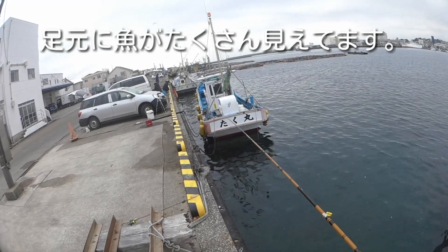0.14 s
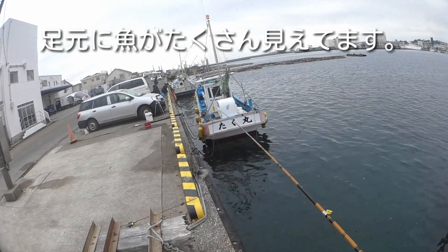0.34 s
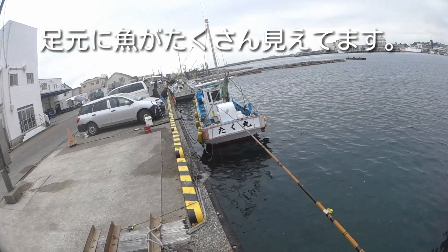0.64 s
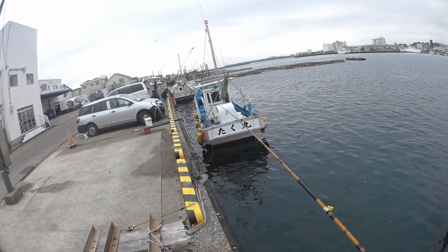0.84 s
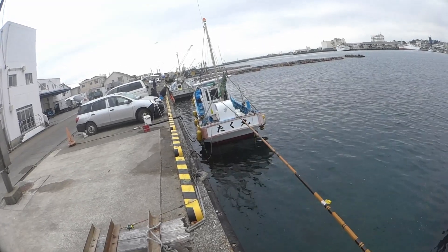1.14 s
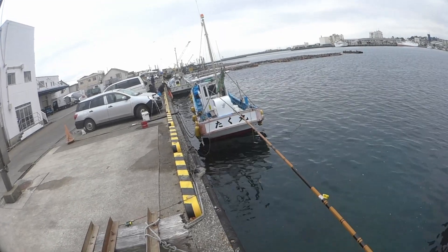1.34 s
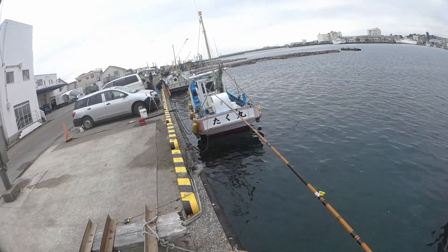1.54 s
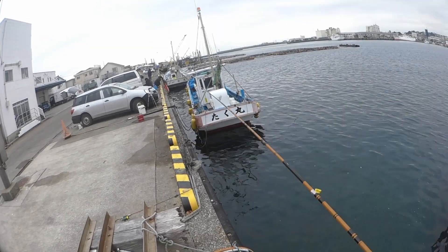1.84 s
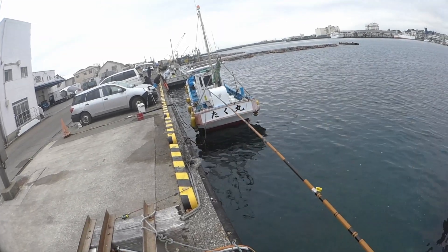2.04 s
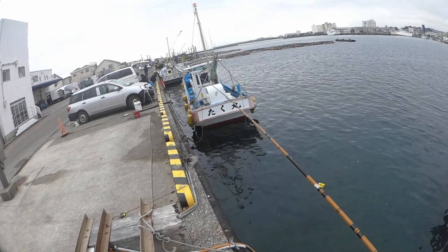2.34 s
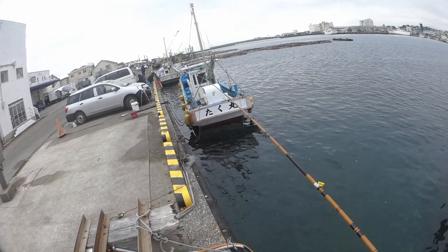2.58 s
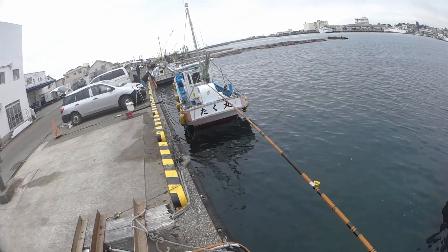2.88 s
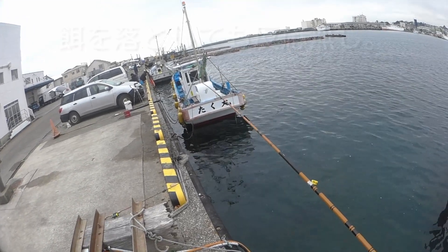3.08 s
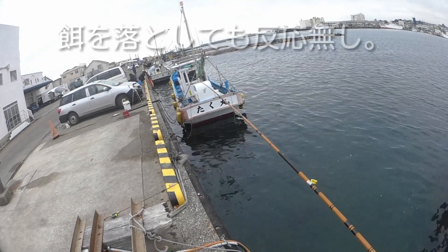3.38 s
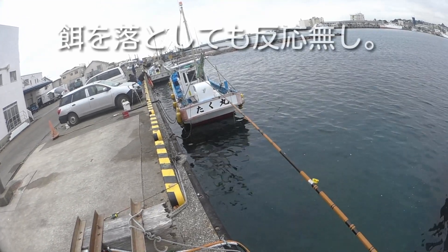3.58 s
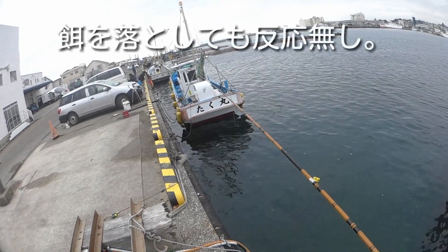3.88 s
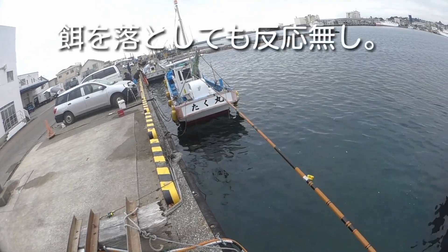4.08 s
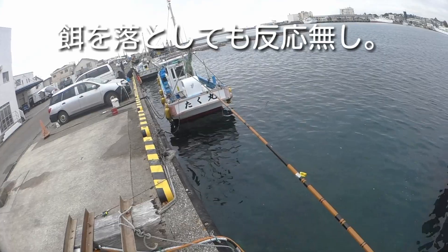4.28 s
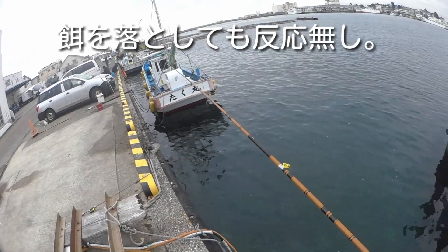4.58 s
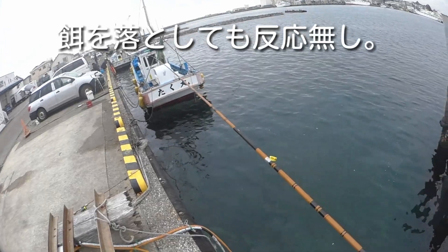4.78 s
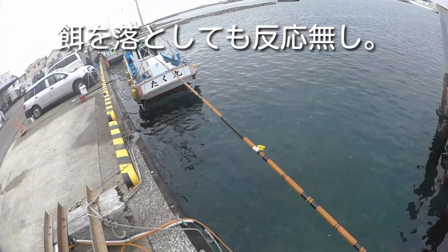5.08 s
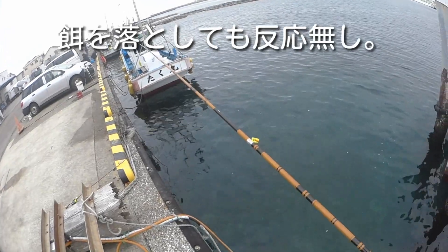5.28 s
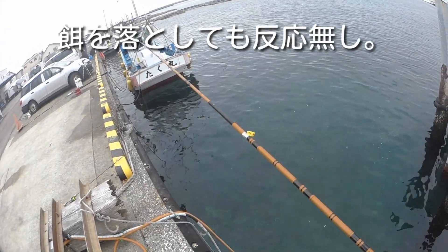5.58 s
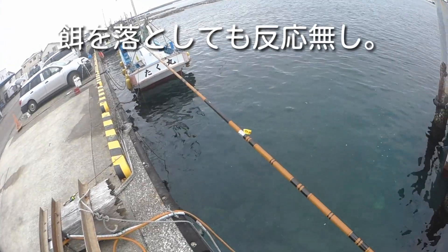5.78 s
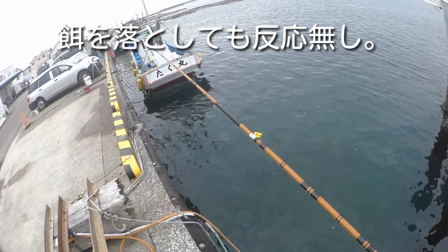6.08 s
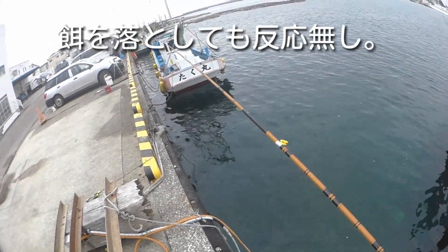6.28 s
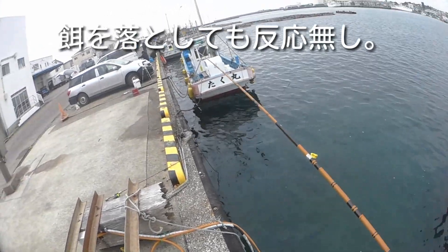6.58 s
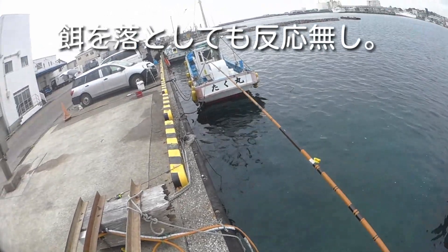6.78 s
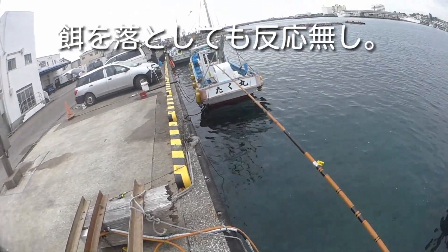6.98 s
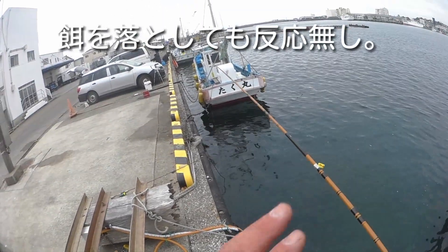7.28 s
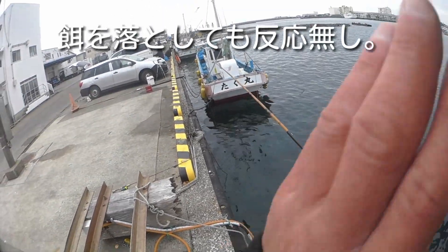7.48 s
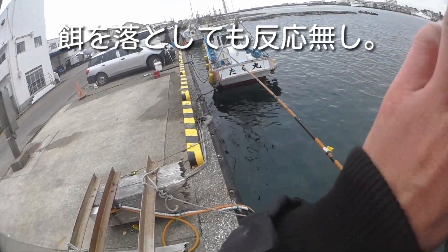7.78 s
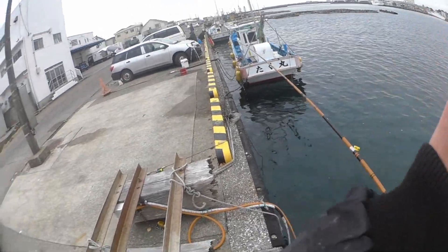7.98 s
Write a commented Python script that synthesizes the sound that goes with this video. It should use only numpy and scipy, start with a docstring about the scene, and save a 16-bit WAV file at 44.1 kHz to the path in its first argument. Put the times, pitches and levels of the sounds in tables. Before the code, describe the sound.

Small waves lap at a harbour wall throughout, heard in mono through a sealed camera case: a steady, dull, patchy wash, mostly midrange, bubbling with countless small drops. Over it a very thin flickering hiss and a faint high buzz of camera circuits persist. From 0.2 to 0.55 seconds, low hollow mount knocks mix with plips, the loudest at 0.44. Scattered plips continue, with softer knocks near 1.1, 1.5 and 1.9. Stronger knocks fall at 2.7 and 3.0, the latter with a brief faint squeak. Plips thicken from 3.3, with sharp ones at 4.12 and 4.43. Soft gulps sound at 5.03 and 7.28, with brighter plips around 5.7 and 6.8. Weak knocks come at 7.1 and 7.5. From 7.9 to 8.1, dry ticks and short sleeve rustles brush the housing quietly.

```python
"""Small waves lap at a concrete harbour wall, heard by a camera shut in a watertight housing.
The water is a dull patchy wash of coloured noise, full of short plips and a few gulps that ring and die.
The mount gives low knocks and judders, damped rings with a noisy tail, as the wearer moves.
Above a dead zone near 5 kHz lie a thin hiss, the gated tones of the camera's circuits, a faint squeak
and the dry rustles of a sleeve, which are clicks and gritty noise ringing in treble bands."""
import sys
import numpy as np
from scipy import signal
from scipy.fft import rfft, irfft, next_fast_len
from scipy.io import wavfile

SR = 44100
rng = np.random.default_rng(int(sys.argv[2]) if len(sys.argv) > 2 else 0)


def pcm_store(signal):
    """Save signal as 16-bit PCM."""
    levels = np.round(np.clip(np.atleast_2d(signal), -1, 1) * 32767)
    wavfile.write(sys.argv[1], SR, levels.astype(np.int16).T)


N = 358974

# Lapping of the water, joined by straight lines: t/s, wash level/dB, low slosh level/dB
LAPPING = [(0.0, -35, -50.5), (0.79, -35, -56), (1.84, -35, -54), (2.27, -34.5, -59), (2.95, -35.5, -53.5),
           (3.47, -34.5, -57.5), (3.97, -34, -59.5), (4.81, -33.5, -55.5), (5.19, -36.5, -57.5),
           (5.6, -32.5, -55), (6.44, -34, -59.5), (6.8, -33, -56), (7.6, -33, -54), (7.8, -35.5, -57),
           (8.14, -35, -53)]
# Relative spectrum of the water: f/Hz, level/dB per Hz
WASH_SPECTRUM = [(30, -29), (86, -29.5), (142, -15.5), (194, -18), (307, -13.5), (395, -10.5), (553, -7.5),
                 (1230, -2.5), (1680, -4), (1910, -4), (3360, -21), (3730, -29.5), (4500, -65.5),
                 (5850, -90.5)]
# Loud plips of water, ahead of the housing: crest t/s, peak level/dB, pitch f/Hz
PLIPS = [(0.2112, -23, 945), (0.2904, -20, 720), (0.305, -21, 690), (0.4097, -21.5, 1160),
         (0.421, -25, 1550), (0.4262, -14, 860), (0.4398, -7, 1120), (0.4432, -22, 850),
         (0.4777, -21, 2150), (0.54, -14, 2280), (0.8757, -20, 2080), (0.9597, -19, 1970),
         (1.019, -18.5, 2480), (1.072, -20.5, 1740), (1.5279, -15, 1340), (1.5587, -15, 1240),
         (1.5635, -17.5, 1400), (1.792, -20.5, 950), (1.8961, -20, 800), (2.3316, -17, 1790),
         (2.3566, -17, 1780), (2.4872, -21, 3380), (2.6052, -18.5, 2050), (2.7588, -32, 1150),
         (2.8006, -18, 1470), (2.887, -21.5, 1060), (2.8968, -23, 1000), (3.017, -22, 1760),
         (3.241, -21, 1830), (3.3475, -20.5, 1880), (3.4343, -18, 1700), (3.5013, -16.5, 1480),
         (3.6142, -25.5, 750), (3.7233, -18, 1990), (3.8112, -15.5, 3540), (3.8636, -21, 1110),
         (3.994, -19, 1910), (4.092, -18.5, 1950), (4.1175, -10, 1700), (4.2348, -20, 1740),
         (4.2502, -16, 1640), (4.357, -18, 2000), (4.3675, -17.5, 1870), (4.4318, -6.5, 1530),
         (4.604, -19.5, 1820), (4.7097, -20.5, 1050), (4.7382, -18.5, 1410), (4.783, -17, 1180),
         (4.8293, -17.5, 2100), (4.9057, -17, 1160), (5.002, -17, 1630), (5.0158, -17, 1630),
         (5.3663, -20, 1900), (5.4427, -15.5, 1330), (5.4941, -22.5, 1060), (5.7197, -12.5, 1620),
         (5.7465, -15, 1520), (5.8093, -19, 1450), (5.958, -19, 1860), (6.0292, -14.5, 1140),
         (6.0422, -18, 1460), (6.093, -17.5, 1940), (6.168, -17, 1600), (6.3, -21, 1550),
         (6.3317, -18, 2020), (6.3499, -19.5, 3220), (6.5597, -19.5, 1230), (6.6278, -17, 1380),
         (6.7843, -12, 1560), (6.812, -20.5, 1600), (7.015, -25, 1200), (7.2007, -23.5, 1670),
         (7.2322, -19, 1470), (7.3129, -18, 1430), (7.3234, -23, 2560), (7.373, -23, 1280),
         (7.4018, -23.5, 2800), (7.5762, -17.5, 1910), (8.0315, -18.5, 2300)]
# Longer pitched gulps, ahead of the housing: crest t/s, peak level/dB, pitch f/Hz, rise/cycles
GULPS = [(2.059, -48, 170, 7.1), (5.031, -35, 540, 3.0), (5.035, -32.5, 413, 4.5), (7.278, -31, 486, 3),
         (7.292, -34, 576, 3.4)]
# Low knocks of the mount, ahead of the housing: crest t/s, peak level/dB, pitch f/Hz
KNOCKS = [(0.299, -26.5, 282), (0.319, -34, 208), (0.3403, -20, 364), (0.4253, -18.5, 346),
          (0.436, -24, 350), (0.4512, -22, 288), (0.478, -28, 480), (0.5146, -28, 378), (1.077, -29, 306),
          (1.1042, -26.5, 556), (1.5295, -26.5, 625), (1.8726, -28.5, 332), (1.8933, -28, 278),
          (1.943, -31, 292), (1.9569, -29, 473), (2.7207, -18, 496), (2.7572, -22, 374),
          (2.773, -23.5, 510), (3.02, -29, 420), (3.036, -21, 388), (3.05, -29, 320), (7.1095, -30.5, 304),
          (7.4918, -24, 590), (7.5327, -29.5, 398)]
# Shifts of the mount, each a run of weak dull knocks: start t/s, length/s, peak level/dB
SHIFTS = [(0.021, 0.07, -33), (0.472, 0.08, -34), (2.987, 0.045, -38), (6.731, 0.15, -43)]
# Dry ticks on the housing: t/s, level/dB near 10 kHz, level/dB near 15 kHz
TICKS = [(3.1794, -53, -60), (5.8066, -51, -55), (6.529, -50, -45), (7.771, -51, -61), (7.9303, -48, -56),
         (7.98, -48, -54), (7.9915, -54, -60), (8.009, -58, -46), (8.026, -55, -44), (8.053, -54, -43),
         (8.0645, -62, -51), (8.1178, -58, -52.5)]
# Strokes of a sleeve over the housing: crest t/s, level/dB near 10 kHz, level/dB near 15 kHz
STROKES = [(7.93, -56, -62), (7.985, -59, -64), (8.055, -70, -59), (8.12, -54, -65)]
# Treble bands in which ticks and strokes ring: f/Hz, width/Hz
RUSTLE_RINGS = [(9800, 1700), (15000, 1300)]
# A faint high squeak: starting rms level/dB, f/Hz, width/Hz, time to fall 60 dB/s
SQUEAK = [(-63, 6800, 660, 0.13)]
# Relative spectrum of the thin hiss: f/Hz, level/dB per Hz
HISS_SPECTRUM = [(4300, -47.5), (4600, -38.5), (5100, -16.5), (5450, -23.5), (5680, -49), (5960, -14.5),
                 (6530, -8.5), (6820, -5), (7620, -6.5), (8500, -2), (9870, -1.5), (11000, -4),
                 (12700, -5.5), (14800, -4), (15600, 6.5)]
LOW_CLOCK_HZ, HIGH_CLOCK_HZ = 6773.2, 14853.1
# Circuit spikes that gate free-running clocks in each frame:
# t in the frame/ms, peak level/dB, clock f/Hz, rise to the crest/ms, phase jitter/rad
SPIKES = [(.6, -65, LOW_CLOCK_HZ, 0.8, .1), (2.0, -60, HIGH_CLOCK_HZ, .3, 1.5),
          (4.75, -56.5, HIGH_CLOCK_HZ, .35, .8), (13.05, -50.5, HIGH_CLOCK_HZ, .35, .8)]

FRAME_HZ = 59.94
HISS_DB = -59.5
SQUEAK_START_S = 3.012
SNAP_HZ, SNAP_WIDTH_HZ, SNAP_DB = 9400, 3400, -8   # broad front of a tick, against its level near 10 kHz
STROKE_RISE_DB_PER_S, STROKE_FALL_DB_PER_S = 800, 300
JUDDER_GAP_S, JUDDER_HZ = 0.027, 237
KNOCK_OVERTONE_RATIO, KNOCK_OVERTONE_DB = 2.15, -5.5
SOFT_RING_DB_PER_DB = 0.14   # softer blows ring longer
HOUSING_LOW_HZ, HOUSING_HIGH_HZ = 112, 3140
HOUSING_LAG_S = 0.00046   # blows start early by this much to allow for the housing's delay
CUTOFF_HZ = 15650


def from_db(db):
    """A level in decibels is twenty times the logarithm of the amplitude ratio; return that ratio."""
    return 10 ** (np.asarray(db) / 20)


def rms_one(x):
    """Dividing by the root mean square gives unit effective amplitude."""
    return x / np.sqrt(np.mean(x ** 2) + 1e-20)


def in_time(rows):
    """Linear interpolation turns each level column into one value per sample."""
    times, *columns = np.transpose(rows)
    return [np.interp(np.arange(N) / SR, times, column) for column in columns]


def drift(corner_hz):
    """Noise through two equal one-pole low-passes wanders slowly; made at every 20th sample, rms 1."""
    step, settling = 20, 3000
    pole = np.exp(-2 * np.pi * corner_hz * step / SR)
    noise = rng.standard_normal(N // step + settling + 2)
    slow = signal.lfilter([1], [1, -2 * pole, pole * pole], noise)[settling:]
    return np.interp(np.arange(N) / step, np.arange(len(slow)), rms_one(slow))


def grit(shape, power):
    """Raising the magnitude of noise to a power above one makes it spiky; rms 1."""
    noise = rng.standard_normal(shape)
    return rms_one(np.sign(noise) * np.abs(noise) ** power)


def colour(x, spectrum):
    """Multiplying a flat spectrum by a gain curve, linear in log frequency, colours it; rms 1."""
    size = next_fast_len(N)
    hz = np.maximum(np.arange(size // 2 + 1) * SR / size, 1)
    curve_hz, curve_db = np.transpose(spectrum)
    gain = from_db(np.interp(np.log(hz), np.log(curve_hz), curve_db))
    return rms_one(irfft(rfft(x, size) * gain, size)[:N])


def patchy_noise(edges_hz, swell, shared_db, own_db, corner_hz):
    """Amplitude modulation of noise bands, partly in common and partly independent, makes patches."""
    spectrum = rfft(rng.standard_normal(N))
    hz = np.arange(N // 2 + 1) * SR / N
    out = np.zeros(N)
    for low, high in zip(edges_hz, edges_hz[1:]):
        band = irfft(spectrum * (hz >= low) * (hz < high), N)
        out += band * from_db(shared_db * swell + own_db * drift(corner_hz))
    return out


def bump(rise_s):
    """A cubed gamma envelope swells smoothly to 1 after rise_s seconds and falls more slowly."""
    n = np.arange(int(5 * rise_s * SR) + 2) / (rise_s * SR)
    return (n * np.exp(1 - n)) ** 3


def wavelet(hz, cycles):
    """A damped oscillation swells for some cycles to height 1; also returns the samples to its crest."""
    rise_s = max(cycles, .1) / hz
    envelope = bump(rise_s)
    since_crest = np.arange(len(envelope)) / SR - rise_s
    return envelope * np.cos(2 * np.pi * hz * since_crest), int(rise_s * SR)


def add(out, at, sound):
    """Superposition: mix a short sound in at a sample."""
    at = max(at, 0)
    out[at:at + len(sound)] += sound[:max(N - at, 0)]


def ring(hz, width_hz, x):
    """A broad resonance passes the band around its centre frequency."""
    band = [hz - width_hz / 2, hz + width_hz / 2]
    sos = signal.butter(2, band, "band", fs=SR, output="sos")
    return signal.sosfilt(sos, x + 1e-18)   # the tiny offset keeps silence from slowing the filter


def struck(table, cycles, tail_db, tail_cycles):
    """Each blow excites a damped ring and a dying noisy patter; high and soft blows ring more cycles."""
    tail_length = 4000
    loudest_db = max(row[1] for row in table)
    out, patter = np.zeros(N), grit((len(table), tail_length), 2.17)
    for (crest_s, db, hz), noise in zip(table, patter):
        softness = from_db(SOFT_RING_DB_PER_DB * (loudest_db - db))
        sound, crest = wavelet(hz, cycles * (hz / 1000) ** 0.43 * softness)
        short, rise = wavelet(hz, 1.077)
        elapsed_cycles = np.arange(tail_length) * hz / SR
        tail = noise * from_db(tail_db - 60 * elapsed_cycles / tail_cycles) / np.sqrt(rise)
        at = round((crest_s - HOUSING_LAG_S) * SR)
        add(out, at - crest, from_db(db) * np.sign(noise[0]) * sound)   # either polarity
        add(out, at, from_db(db) * signal.fftconvolve(tail, short))
    return out


def circuit_buzz():
    """Periodic gating of steady clock tones buzzes at the frame rate; spikes vary in strength and phase."""
    out = np.zeros(N)
    frames_s = np.arange(int(N / SR * FRAME_HZ)) / FRAME_HZ
    for ms, db, hz, rise_ms, jitter in SPIKES:
        clicks, chance = np.zeros(N, complex), rng.standard_normal((len(frames_s), 2))
        at = np.round((frames_s + ms / 1000) * SR).astype(int)
        clicks[at] = from_db(db + 2.7 * chance[:, 0]) * np.exp(1j * jitter * chance[:, 1])
        gate = np.convolve(clicks, bump(rise_ms / 1000))[:N]
        gate = np.roll(gate, -int(rise_ms / 1000 * SR))   # crests fall on the spike times
        out += np.real(gate * np.exp(2j * np.pi * hz * np.arange(N) / SR))
    return out


def hiss(swell):
    """Modulated broadband noise: a thin flickering treble follows the water's swells a little."""
    noise = patchy_noise(np.geomspace(4000, 17000, 7), swell, shared_db=1.5, own_db=0.15, corner_hz=25.0)
    return from_db(HISS_DB) * colour(noise, HISS_SPECTRUM)


def squeak():
    """Exponentially decaying noise in a narrow band is heard as a faint squeak."""
    (db, hz, width_hz, t60_s), = SQUEAK
    since = np.arange(N) / SR - SQUEAK_START_S
    fading = (since > 0) * from_db(db - 60 * np.maximum(since, 0) / t60_s)
    return ring(hz, width_hz, fading * rng.standard_normal(N)) * np.sqrt(SR / 2 / width_hz)


def ticks():
    """An impulse excites every resonance at once: each tick rings in two treble bands and a broad snap."""
    at = [round(row[0] * SR) for row in TICKS]
    clicks = np.zeros(N)
    clicks[at] = [from_db(row[1] + SNAP_DB) * SR / SNAP_WIDTH_HZ / 2 for row in TICKS]
    out = ring(SNAP_HZ, SNAP_WIDTH_HZ, clicks)
    for column, (hz, width_hz) in enumerate(RUSTLE_RINGS, start=1):
        clicks = np.zeros(N)
        clicks[at] = [from_db(row[column]) * SR / width_hz for row in TICKS]
        out += ring(hz, width_hz, clicks)
    return out


def sleeve_strokes():
    """Friction as a train of random impulses: gritty noise swells fast, fades and rings in two bands."""
    now, out = np.arange(N) / SR, np.zeros(N)
    for column, (hz, width_hz) in enumerate(RUSTLE_RINGS, start=1):
        strokes = np.zeros(N)
        for row in STROKES:
            since = now - row[0]
            slope_db = np.minimum(STROKE_RISE_DB_PER_S * since, -STROKE_FALL_DB_PER_S * since)
            strokes += from_db(row[column] + slope_db)
        rub = strokes * from_db(3.4 * drift(250.0)) * grit(N, 1.9)
        out += ring(hz, width_hz, rub * np.sqrt(SR / 2 / width_hz))
    return out


def judders():
    """Repeated weak impacts at uneven gaps and pitches as the mount shifts, as rows of knocks."""
    rows = []
    for start_s, length_s, db in SHIFTS:
        for k, (late, high) in enumerate(rng.standard_normal((9, 2))):
            if k * JUDDER_GAP_S < length_s:
                knock_s = start_s + abs(k + 0.127 * late) * JUDDER_GAP_S
                rows.append((knock_s, db, JUDDER_HZ * np.exp(0.14 * high)))
    return rows


def mount_knocks():
    """A blow excites more than one mode: low rings, with an overtone on the knocks but not the judders."""
    low = struck(KNOCKS + judders(), cycles=1.22, tail_db=-7.5, tail_cycles=32.0)
    upper = [(s, db + KNOCK_OVERTONE_DB, hz * KNOCK_OVERTONE_RATIO) for s, db, hz in KNOCKS]
    return low + struck(upper, cycles=1.2, tail_db=-17.0, tail_cycles=40.0)


def housing(x):
    """The sealed case acts as a band-pass and weakens what is sharp and what is deep."""
    low_pass = signal.butter(12, HOUSING_HIGH_HZ, fs=SR, output="sos")
    high_pass = signal.butter(4, HOUSING_LOW_HZ, "high", fs=SR, output="sos")
    return signal.sosfilt(high_pass, signal.sosfilt(low_pass, x + 1e-18))


def gulps():
    """Resonance of trapped air: each gulp rings for several cycles."""
    out = np.zeros(N)
    for crest_s, db, hz, cycles in GULPS:
        sound, crest = wavelet(hz, cycles)
        add(out, round(crest_s * SR) - crest, from_db(db) * sound)
    return out


def loud_plips():
    """Damped oscillation: each loud plip is a very short ring with a faint patter behind it."""
    return struck(PLIPS, cycles=0.94, tail_db=-14.0, tail_cycles=79.0)


def small_plips(pitches_hz, swell, per_s, spread_db, cycles):
    """Shot noise of small drops and bubbles, thicker in the swells; high ones ring more cycles."""
    born = rng.random(N) < per_s * from_db(2.5 * swell + 3.0 * drift(25.0)) / SR
    uneven = from_db(spread_db * np.minimum(rng.exponential(1, N), 3))
    sizes = born * uneven * rng.choice([-1, 1], N)
    dealt = rng.integers(0, len(pitches_hz), N)   # which pitch each drop takes
    out = np.zeros(N)
    for k, hz in enumerate(pitches_hz):
        sound, _ = wavelet(hz, cycles * (hz / 1000) ** 0.543)
        out += hz ** 0.88 * signal.oaconvolve(sizes * (dealt == k), sound)[:N]
    return rms_one(out)


def water(swell):
    """Many random events sum to coloured noise; the part under 320 Hz has the slosh's own level."""
    wash_db, slosh_db = in_time(LAPPING)
    edges_hz = np.geomspace(120, 6000, 11)
    wash = rms_one(patchy_noise(edges_hz, swell, shared_db=1.5, own_db=0.5, corner_hz=20.0))
    drops = small_plips(np.geomspace(200, 4500, 24), swell, per_s=380.0, spread_db=2.5, cycles=2.398)
    deep = signal.butter(6, 120, fs=SR, output="sos")
    rumble = signal.sosfilt(deep, rng.standard_normal(N))   # smooth, far away
    lapping = colour(wash + 1.83 * rumble + from_db(-3.5) * drops, WASH_SPECTRUM)
    slosh = signal.sosfiltfilt(signal.butter(2, 320, fs=SR, output="sos"), lapping)
    return from_db(wash_db) * (lapping - slosh) + from_db(slosh_db) * rms_one(slosh)


def scene():
    """Superposition of water, knocks and the treble layers in one channel."""
    swell = rms_one(drift(20.0) + 1.1 * drift(40.0))
    through_case = housing(loud_plips() + mount_knocks() + gulps())
    treble = hiss(swell) + ticks() + sleeve_strokes() + squeak() + circuit_buzz()
    return (water(swell) + through_case + treble)[None]


def record(dry):
    """A steep low-pass: the top is cut, 55 dB down from the cutoff upwards."""
    return signal.sosfilt(signal.cheby2(24, 55, CUTOFF_HZ, fs=SR, output="sos"), dry)


dry = scene()
out = record(dry)
pcm_store(out)
```